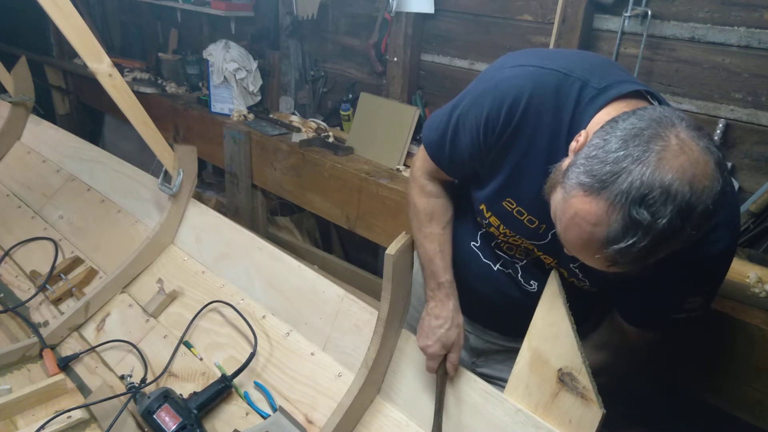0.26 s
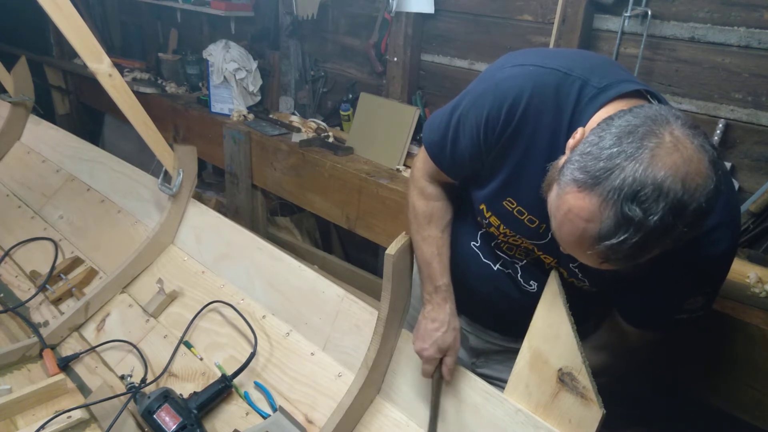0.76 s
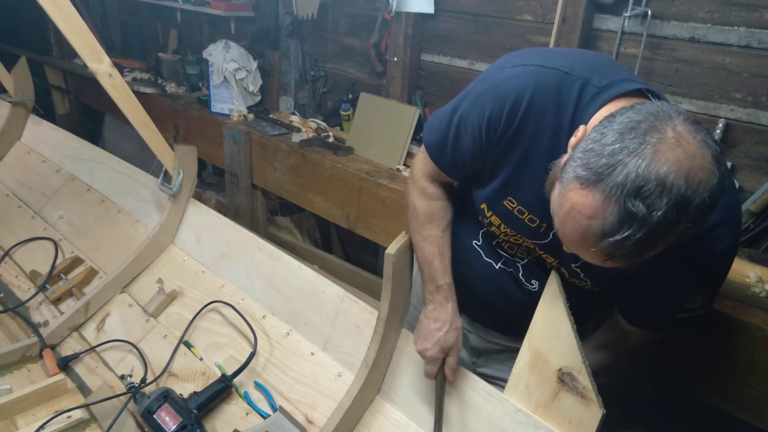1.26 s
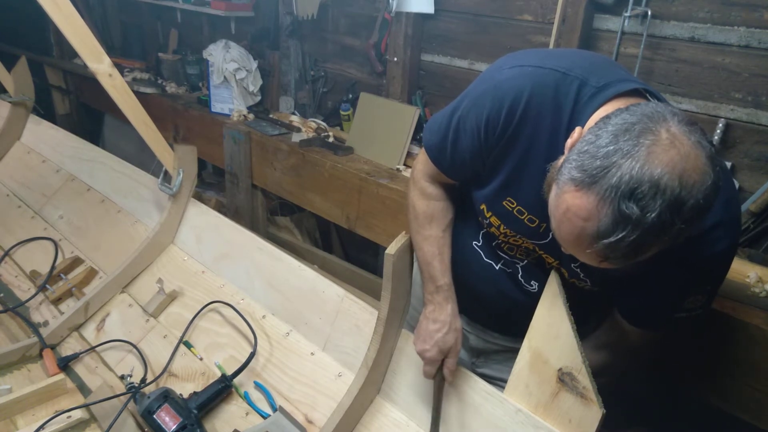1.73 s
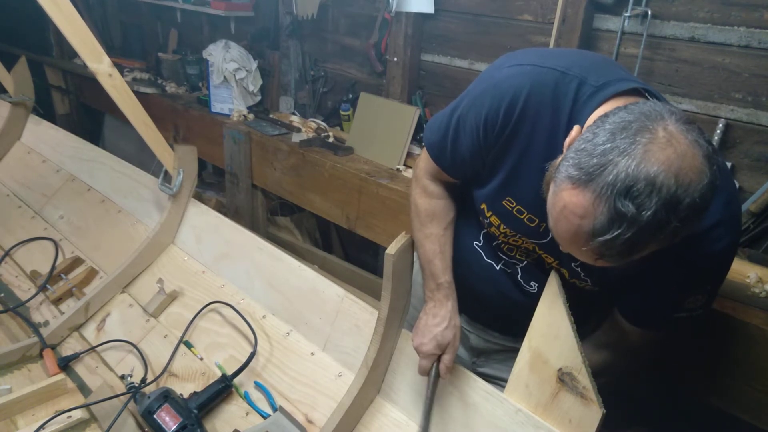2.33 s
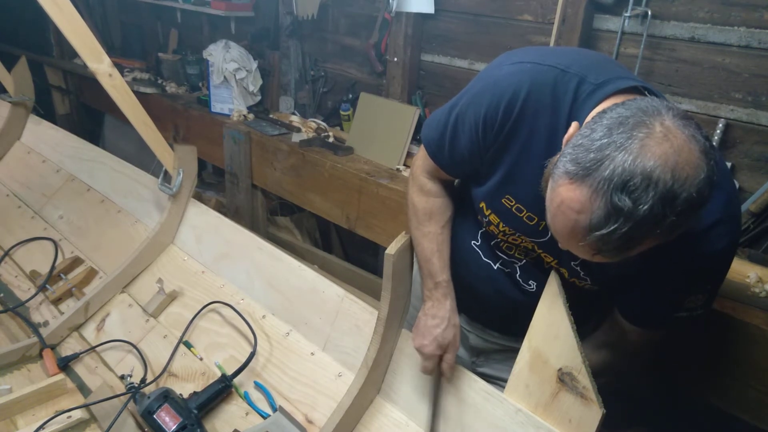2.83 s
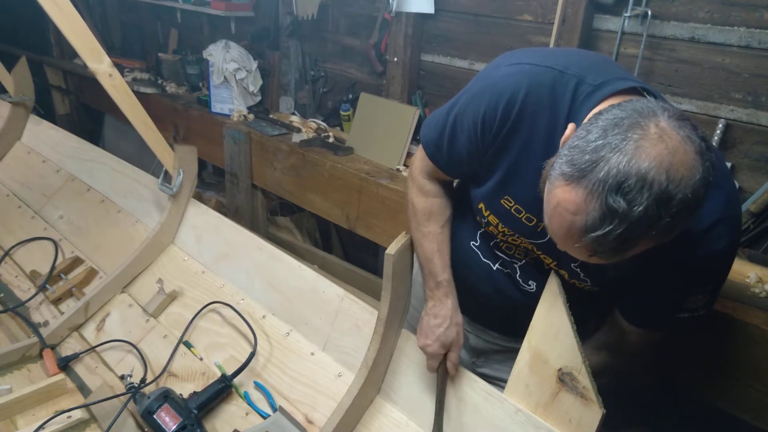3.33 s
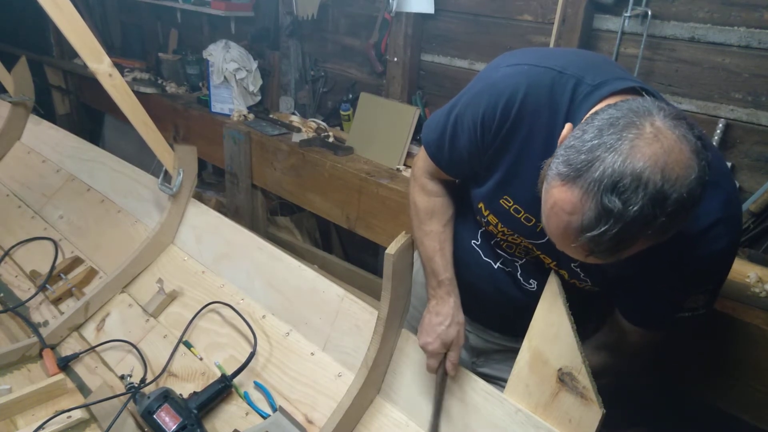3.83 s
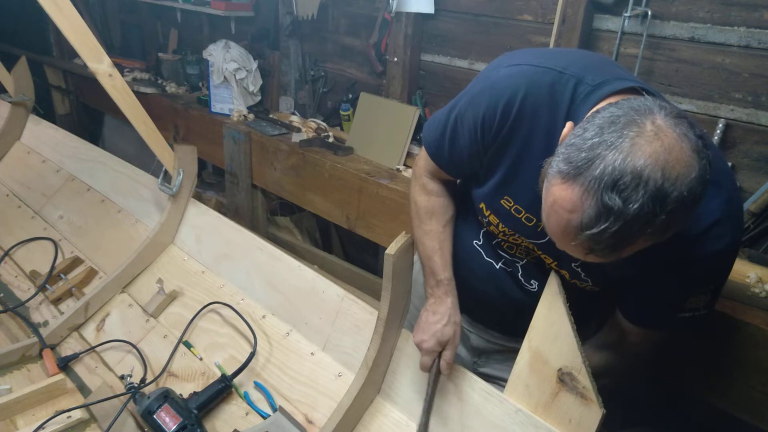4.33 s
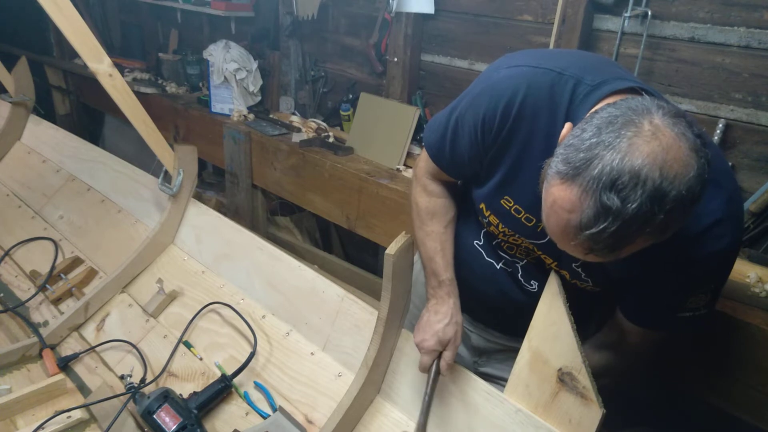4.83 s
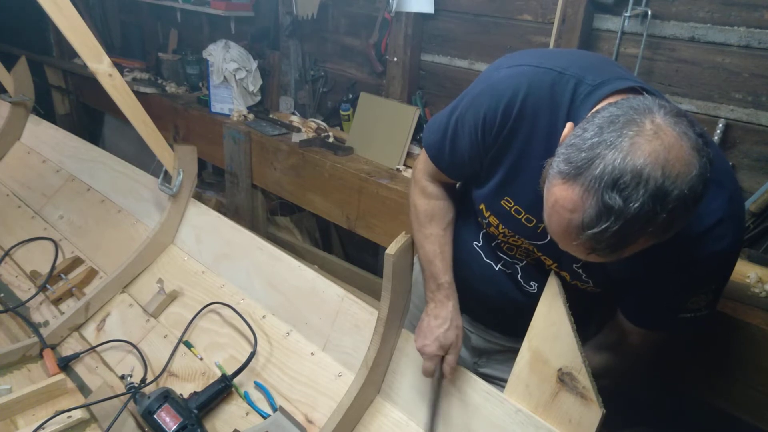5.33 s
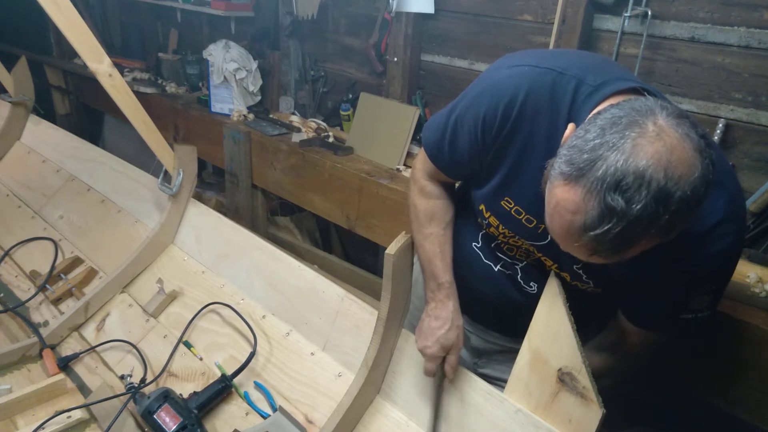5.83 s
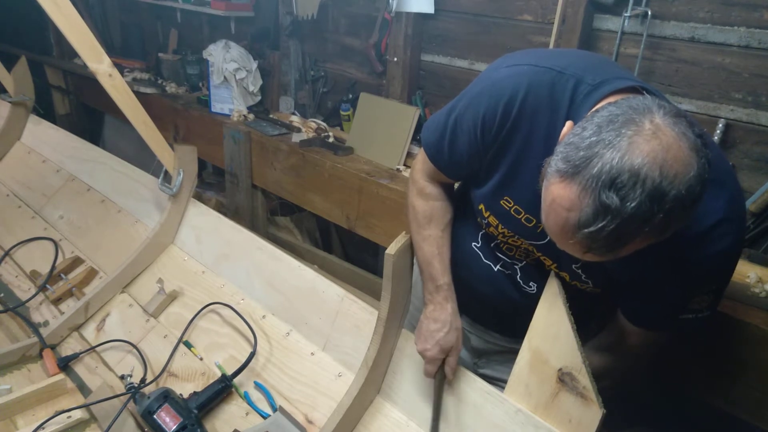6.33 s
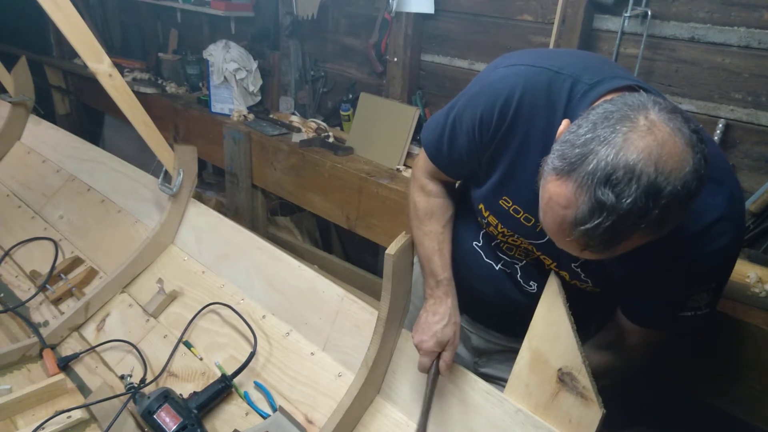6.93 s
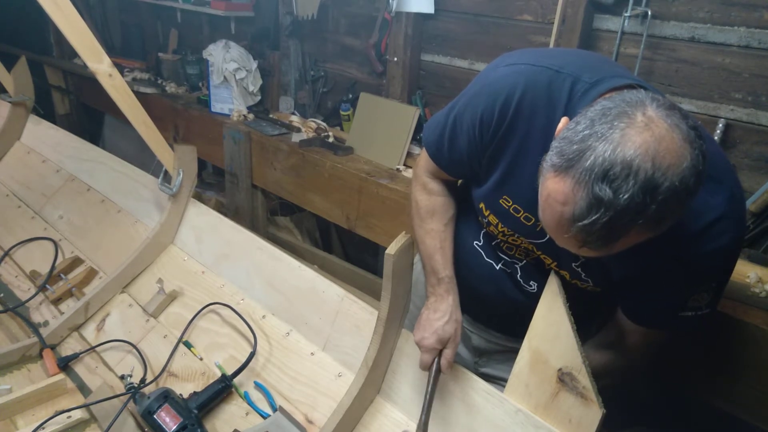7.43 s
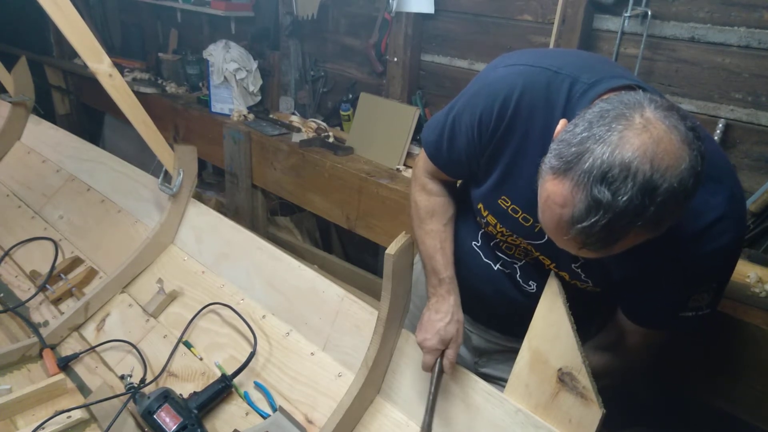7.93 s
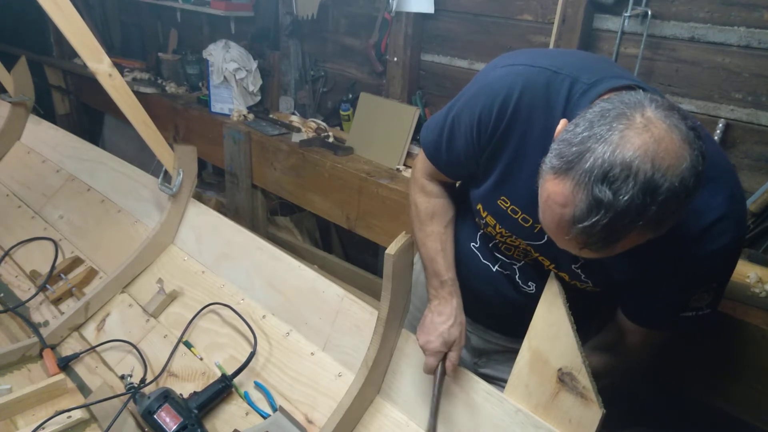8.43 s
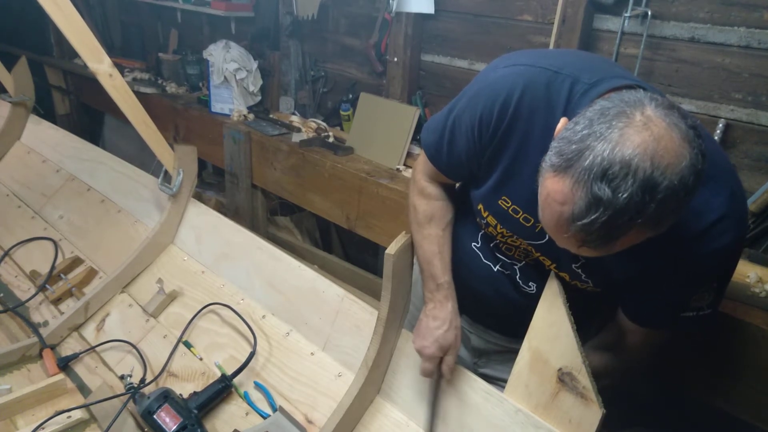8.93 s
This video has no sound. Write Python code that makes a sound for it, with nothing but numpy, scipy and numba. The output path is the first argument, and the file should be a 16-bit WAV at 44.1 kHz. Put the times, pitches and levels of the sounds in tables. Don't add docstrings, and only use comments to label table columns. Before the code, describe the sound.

A hammer strikes metal rivets on a wooden boat hull, about four sharp, loud, even blows a second, with a low hull boom.

```python
import sys
import numpy as np
from scipy import signal
from scipy.fft import rfft, irfft, next_fast_len
from scipy.io import wavfile
from numba import njit

SR = 44100
rng = np.random.default_rng(int(sys.argv[2]) if len(sys.argv) > 2 else 0)


def file_out(sig):
    cols = np.atleast_2d(sig).T
    lim = np.clip(cols, -1, 1)
    pcm = np.round(lim * 32767).astype(np.int16)
    wavfile.write(sys.argv[1], SR, pcm)


def gain_from_db(level_db):
    decades = np.asarray(level_db, float) / 20
    return 10 ** decades


N = 403956
PAD = SR // 10

# start_s [s], blow_db [dB], wood_db [dB], metal_db [dB]
FIRST_RIVET_BLOWS = [(-.002, 5.5, -21.5, -12.5), (0.237, 6.5, -22.5, -13.5), (0.485, -1.5, -18, -8.5),
                     (0.736, 2.5, -25.5, -9), (0.978, 2, -22.5, -8), (1.205, -2, -15.5, -7),
                     (1.437, -4, -8.5, -10), (1.669, 3, -23, -8.5), (1.897, 1, -19.5, -8.5),
                     (2.124, 4.5, -19.5, -8), (2.363, -2.5, -15.5, -9.5), (2.598, -1, -19.5, -9.5),
                     (2.835, 1, -20.5, -8.5), (3.065, 3, -20, -12.5), (3.292, 5, -21, -12),
                     (3.523, 6.5, -24.5, -10), (3.757, 3, -19.5, -11), (3.988, 3, -20.5, -14.5),
                     (4.212, 3, -22.5, -8), (4.443, 4, -25, -9), (4.677, 3.5, -19.5, -12),
                     (4.913, 2.5, -23, -9.5), (5.152, 1, -23.5, -7), (5.38, -3.5, -19.5, -9),
                     (5.626, 0.5, -24.5, -8.5), (5.865, 2.5, -24.5, -9), (6.102, 1, -15, -12.5),
                     (6.339, 4, -22, -10.5), (6.585, -10.5, -2.5, -9)]
# start_s [s], blow_db [dB], wood_db [dB], metal_db [dB]
LAST_RIVET_BLOWS = [
    (6.818, 5.5, -21, -9),
    (7.057, 4, -15.5, -10.5),
    (7.298, 5.8, -18, -10),
    (7.538, 3.5, -15, -10.5),
    (7.772, 7.1, -20.5, -12),
    (8.008, 10.5, -20.5, -12.5),
    (8.248, 7.5, -21, -12.5),
    (8.488, 6.1, -20.5, -7),
    (8.721, 8.4, -23.5, -9.5),
    (8.962, 5.8, -17, -11.5),
]
# pitch_hz [Hz], level_db [dB], t60_s [s]
METAL_MODES = [(3386, -2.5, 0.0014), (3824, -1.5, 0.0031), (5445, 3.5, 0.0012), (7130, 3, 0.0017),
               (9200, 0.5, 0.0012), (11360, -5, 0.00077), (14000, -21.5, 0.004)]
# pitch_hz [Hz], level_db [dB], t60_s [s]
PLANK_MODES = [(205, -7.5, 0.008), (242, 4, 0.048), (346.7, 3.5, 0.05), (440, -1.5, 0.042),
               (496, -3.5, 0.039), (583, 0, 0.038), (710, -4.5, 0.024)]


def blows():
    return np.transpose(np.vstack([FIRST_RIVET_BLOWS, LAST_RIVET_BLOWS]))


def hammer():
    # pitch_hz [Hz], level_db [dB], t60_s [s]
    rib_modes = [(1229, -3.5, 0.028), (1470, 3.5, 0.009), (1630, 0, 0.026), (1828, 5.5, 0.01),
                 (1994, -1.5, 0.03), (2035, 0, 0.017), (2320, -2, 0.022), (2425, -6, 0.016),
                 (2660, -9, 0.0062)]
    # pitch_hz [Hz], level_db [dB], t60_s [s]
    strake_modes = [(799, -3.5, 0.025), (909, -1.5, 0.025), (1036, 2, 0.022), (1192, -4, 0.053)]
    start_s, blow_db, wood_db, metal_db = blows()
    body_db = 23 + 0.45 * wood_db - 0.66 * metal_db
    crack = ring(METAL_MODES, start_s, blow_db + metal_db + 38.5, 1.0, 0.7, size=1024)
    knock = ring(rib_modes, start_s, blow_db + 26.5, 2.0, 0.33, size=4096)
    body = ring(strake_modes, start_s, blow_db + body_db, 0.37, 0.52, size=4096)
    thud = ring(PLANK_MODES, start_s, blow_db + wood_db + 39, 2.0, 0.66, size=4096)
    return crack + knock + body + thud


def near():
    start_s, blow_db, wood_db, metal_db = blows()
    tick = ring(METAL_MODES, start_s, blow_db + metal_db + 17.0, 1.1, 0, size=1024, count=1)
    thump_db = blow_db + 1.62 * wood_db + 36
    thump = ring(PLANK_MODES, start_s, thump_db, 2.2, 0, size=4096, count=1, rise=0.012)
    return tick + thump


def boom():
    # pitch_hz [Hz], level_db [dB], t60_s [s]
    hull_modes = [(58.7, -16, 0.23), (63.7, -20.5, 0.77), (76.37, 2, 0.4), (93.25, -5, 0.35),
                  (101, -7.5, 0.32), (106.7, -10.5, 0.49), (125.8, -11.5, 0.41), (133.43, -11.5, 0.58),
                  (146.5, -6.5, 0.32), (162.3, -11.5, 0.46), (184.4, -12, 0.23), (197, -12, 0.28)]
    boom_db = np.repeat([18.5, 24], [len(FIRST_RIVET_BLOWS), len(LAST_RIVET_BLOWS)])
    start_s = blows()[0] + 0.002
    swing = ring(hull_modes, start_s, boom_db, 2.5, 0, size=SR, count=1, sense=0.98, rise=0.0045)
    return signal.sosfilt(signal.butter(2, 58, "highpass", fs=SR, output="sos"), swing)


def ring(modes, s, db, scatter_db, stray, size, count=4, sense=-1, rise=0):
    hz, mode_db, t60 = np.transpose(modes)
    decay = np.log(1000) / t60
    bank = np.exp(np.outer(2j * np.pi * hz - decay, np.arange(size) / SR)).imag
    bank *= 1 - np.exp(-np.arange(1, size + 1) / (rise * SR + 1e-3))
    chance = rng.standard_normal((len(s), len(hz) + count))
    mode_gain = sense ** np.arange(len(hz)) * gain_from_db(mode_db + scatter_db * chance[:, count:])
    waves = mode_gain @ bank
    blends = np.eye(count)[0] + stray * chance[:, :count]
    out = np.zeros((count, N + PAD + SR + size))
    starts = PAD + (s * SR).astype(int)
    for k, gain, wave, blend in zip(starts, gain_from_db(db), waves, blends):
        out[:, k:k + size] += gain * np.outer(unit(blend), unit(wave))
    return out[:, :N + PAD]


def unit(x):
    return x / np.sqrt(np.sum(x ** 2))


def tools(count=4):
    # pitch_hz [Hz], level_db [dB], t60_s [s]
    tool_modes = [(930, -5, .2), (1540, -9, .15), (1860, -8, .15), (2750, -15, .1), (3190, -13, .12),
                  (3560, -12, .1), (3820, -4, .2), (4770, -6, .15), (5870, -10, .12), (6630, -17, .1),
                  (7090, -14, .1), (9500, -10, .01)]
    # start_s [s], level_db [dB]
    jingle = [
        (0, -66),
        (1.1, -62.5),
        (5.3, -63.5),
        (6.7, -66),
        (7.0, -71),
    ]
    settle_s = (0.091, 0.12)
    hop_s = np.repeat(blows()[0], count)
    chance = rng.random((len(hop_s), 2))
    land_s = hop_s + np.interp(chance[:, 0], (0, 1), settle_s)
    clink_db = np.interp(land_s, *np.transpose(jingle)) + 44 - 10 * chance[:, 1]
    return ring(tool_modes, land_s, clink_db, 2.5, 1.5, size=8192, rise=0.006)


def shed(size=SR // 2):
    # pitch_hz [Hz], level_db [dB], t60_s [s], first_db (first echoes over the tail) [dB],
    # like (left-right likeness) [0-1], pan_db (left minus right) [dB]
    shed_bands = [(150, 3, 0.36, -5, 1, 11), (280, -4, 0.34, -9.5, 1, -1.5), (578, 7, 0.21, -3, 0.8, 1.1),
                  (1410, 0.5, 0.19, 1, 0.17, 0.5), (2930, 7, 0.16, -3, 0, 2), (5300, -7.5, .17, 1, 0.12, 5),
                  (9400, 0, 0.15, 0.5, 0, -1.5), (15000, -4, 0.14, 5.5, 0.6, -9)]
    hz, masks = bands(size)
    known_hz, *known = np.transpose(shed_bands)
    columns = [np.interp(np.log(hz), np.log(known_hz), column)[:, None] for column in known]
    level_db, t60, first_db, like, pan_db = columns
    t = np.arange(size) / SR
    fall_db = first_db * np.exp(-t / 0.015) - 60 * t / t60
    echoes = pair((len(hz), size), np.clip(like, 0, 1)) * gain_from_db(fall_db)
    weights = gain_from_db(level_db + np.array([pan_db, -pan_db]) / 2) / np.sqrt(t60)
    tail = irfft(np.sum(rfft(echoes * weights) * masks, axis=1), size)
    tail[:, size // 2:] *= np.linspace(1, 0, size - size // 2)
    tail[0] = np.roll(tail[0], 9)
    return unit(tail)


def bands(size):
    octave = np.log2(np.fft.rfftfreq(size, 1 / SR) + 1)
    centres = np.arange(5, 14.6, 0.5)
    distance = np.clip(octave - centres[:, None], -0.5, 0.5)
    return 2 ** centres, np.cos(np.pi * distance)


def pair(shape, like):
    mid, side = rng.standard_normal((2,) + shape)
    mid = mid * np.sqrt((1 + like) / 2)
    side = side * np.sqrt((1 - like) / 2)
    return np.array([mid + side, mid - side])


def whine():
    # pitch_hz [Hz], width_hz [Hz], level_db [dB]
    hiss_bands = [
        (3820, 300, -67),
        (4780, 150, -72),
        (10000, 1500, -70.5),
    ]
    out = np.zeros((2, N + PAD))
    for hz, width, db in hiss_bands:
        edges_hz = (hz - width / 2, hz + width / 2)
        sos = signal.butter(2, edges_hz, "bandpass", fs=SR, output="sos")
        band = signal.sosfilt(sos, pair((N + PAD,), 0.3))
        out += band / np.std(band) * gain_from_db(db + 3.0 * waver(N + PAD, step=4000))
    return out


def air():
    # pitch_hz [Hz], level_db [dB per Hz]
    air_spectrum = [(40, -25), (86, 7), (200, -14.5), (500, -13), (1000, -18), (2000, -20.5), (3000, -29.5),
                    (7500, -38), (10000, -33.5), (16000, -57.5)]
    size = next_fast_len(N + PAD)
    hz, masks = bands(size)
    known_hz, known_db = np.transpose(air_spectrum)
    out = np.zeros((2, size))
    for f, mask in zip(hz, masks):
        like = np.clip(1.1 - f / 900, 0, 1)
        noise = irfft(rfft(pair((size,), like)) * mask, size)
        level_db = np.interp(np.log(f), np.log(known_hz), known_db)
        out += noise * gain_from_db(level_db + 2.5 * waver(size, step=2500))
    return out[:, :N + PAD] / np.std(out) * gain_from_db(-46)


def waver(size, step):
    knots = np.arange(0, size + step, step)
    return np.interp(np.arange(size), knots, rng.standard_normal(len(knots)))


def scene():
    heard = np.zeros((2, N + PAD))
    for path in hammer() + tools():
        heard += signal.oaconvolve(path[None], shed(), axes=1)[:, :N + PAD]
    return (heard + near() + boom() + whine() + air())[:, PAD:]


@njit
def follow(x, attack, release):
    e, out = x[0], np.empty(len(x))
    for i in range(len(x)):
        e += (x[i] - e) * (attack if x[i] > e else release)
        out[i] = e
    return out


def top_cut(x):
    return signal.sosfilt(signal.butter(12, 16120, fs=SR, output="sos"), x)


def record(dry):
    sinks_s = (6.736, 6.91)
    ported = signal.sosfilt(signal.butter(3, 52.7, "highpass", fs=SR, output="sos"), dry)
    attack_s, release_s = 0.021, 0.019
    envelope = follow(np.abs(ported).max(axis=0), 1 / (attack_s * SR), 1 / (release_s * SR))
    squeezed = ported * np.minimum(1, gain_from_db(-10.0) / (envelope + 1e-9)) ** 0.057
    ceiling = 0.9
    rounded = squeezed / (1 + np.abs(squeezed / ceiling) ** 4) ** (1 / 4)
    volume = gain_from_db(-8 * np.interp(np.arange(N) / SR, sinks_s, (0, 1)))
    dulled = signal.sosfilt(signal.ellip(8, 0.2, 60, 16060, fs=SR, output="sos"), rounded * volume)
    mix = signal.sosfilt(signal.butter(2, 42, "highpass", fs=SR, output="sos"), dulled)
    return top_cut(mix)


dry = scene()
out = record(dry)
file_out(out)
```